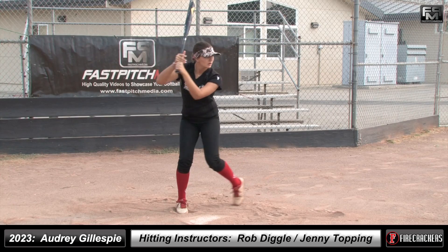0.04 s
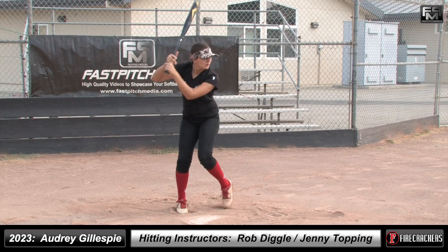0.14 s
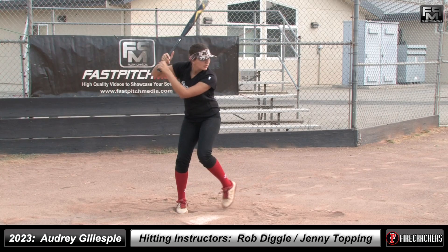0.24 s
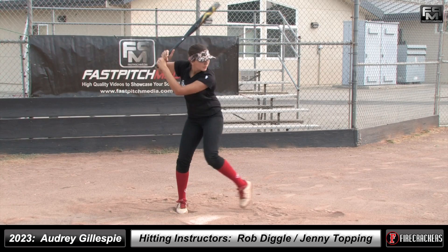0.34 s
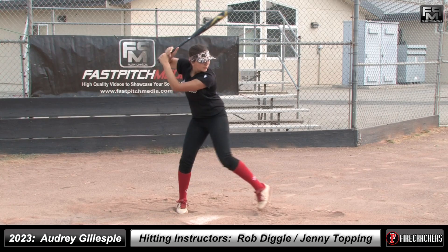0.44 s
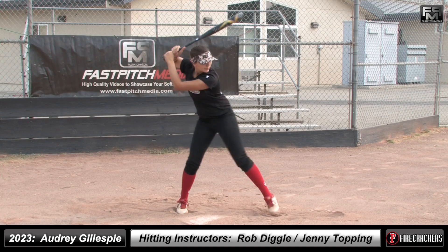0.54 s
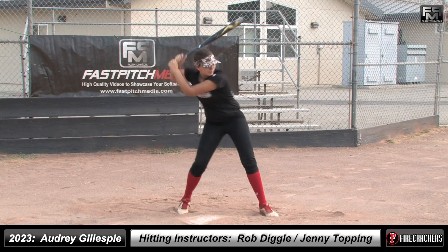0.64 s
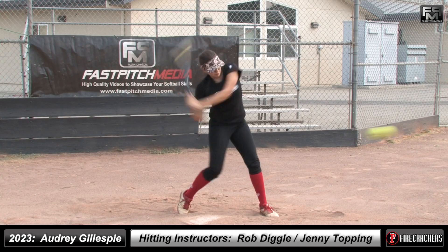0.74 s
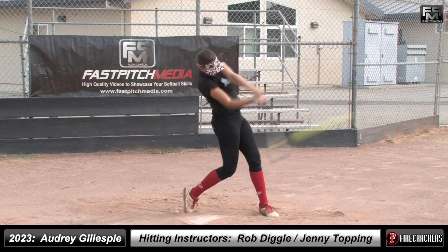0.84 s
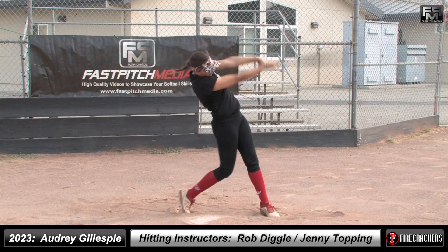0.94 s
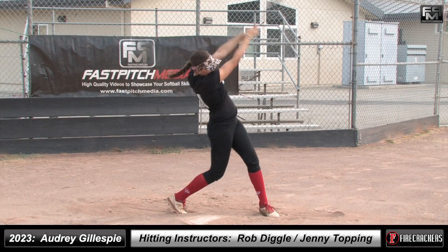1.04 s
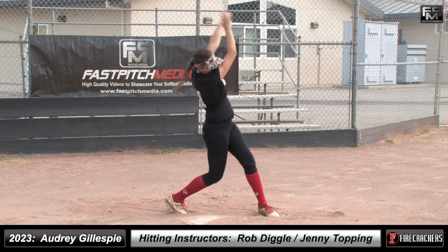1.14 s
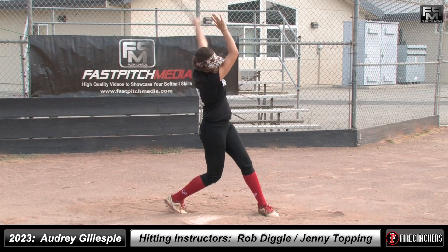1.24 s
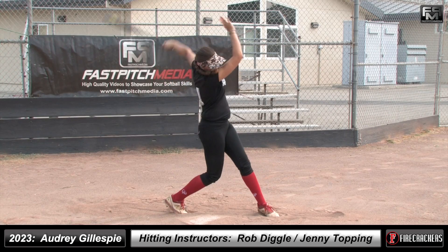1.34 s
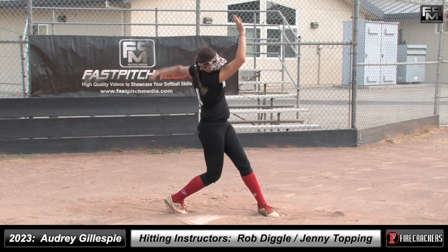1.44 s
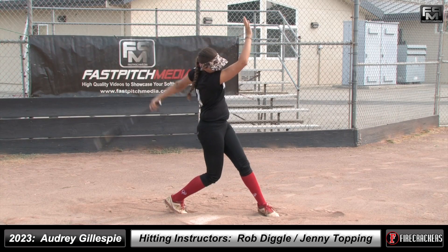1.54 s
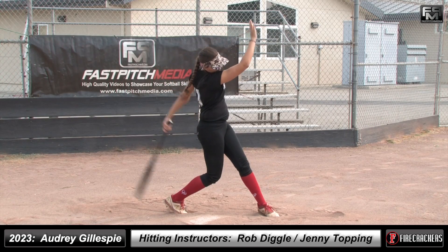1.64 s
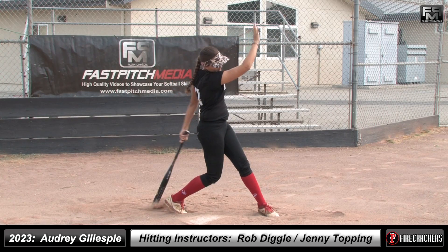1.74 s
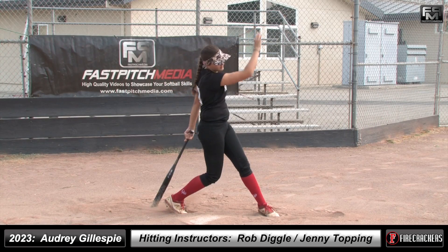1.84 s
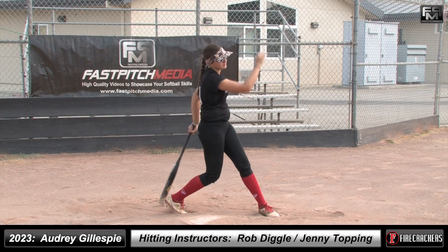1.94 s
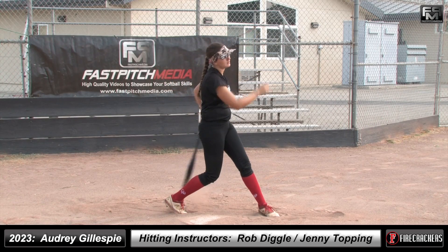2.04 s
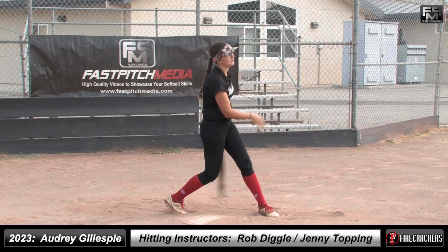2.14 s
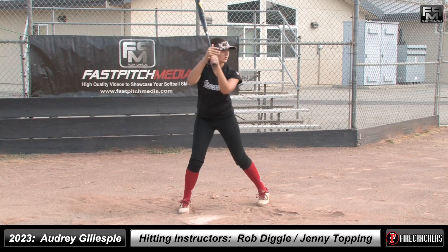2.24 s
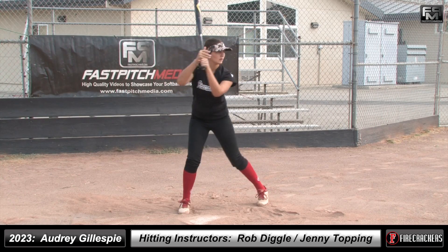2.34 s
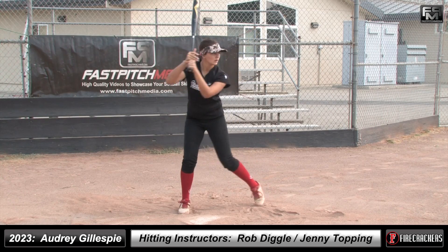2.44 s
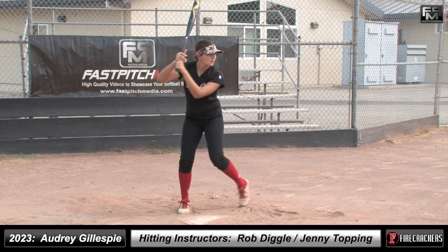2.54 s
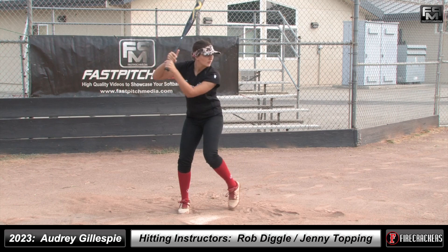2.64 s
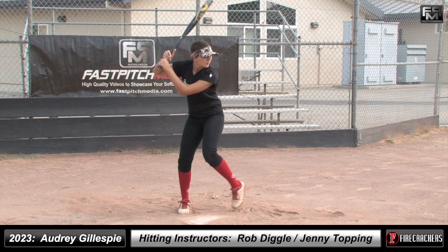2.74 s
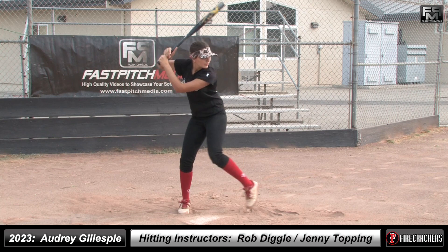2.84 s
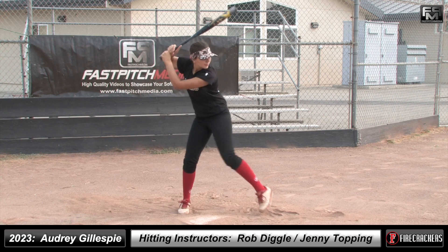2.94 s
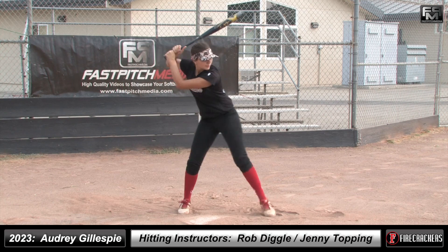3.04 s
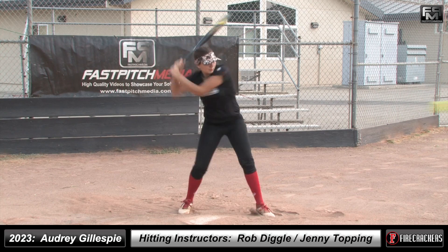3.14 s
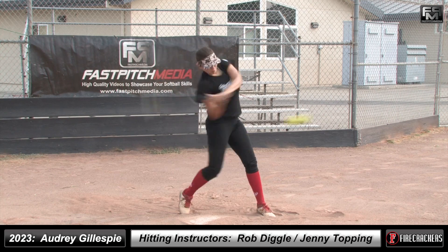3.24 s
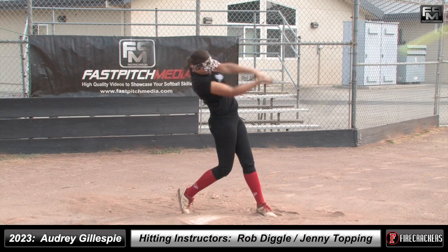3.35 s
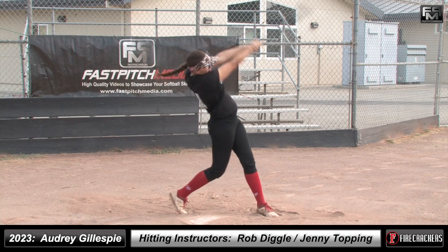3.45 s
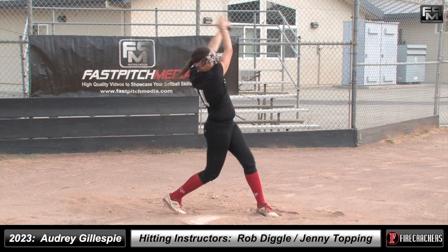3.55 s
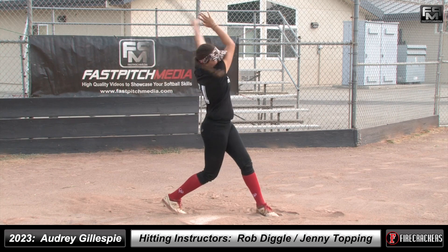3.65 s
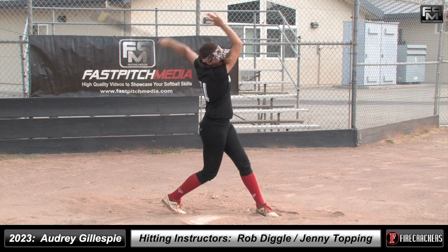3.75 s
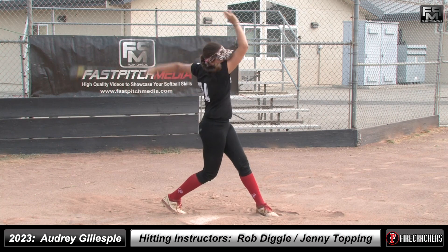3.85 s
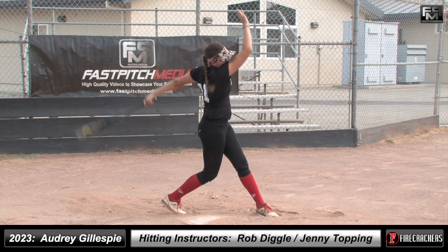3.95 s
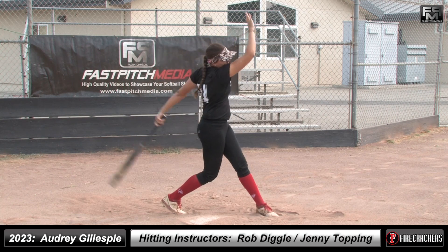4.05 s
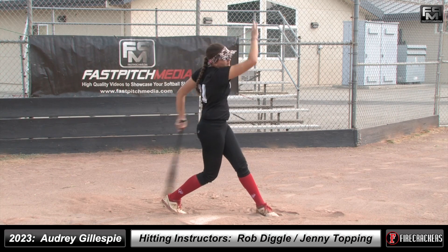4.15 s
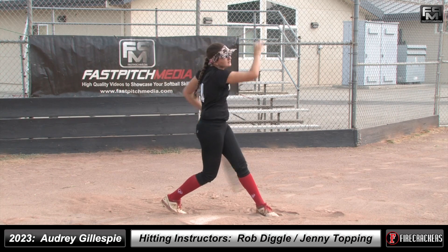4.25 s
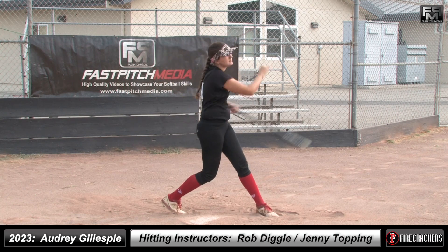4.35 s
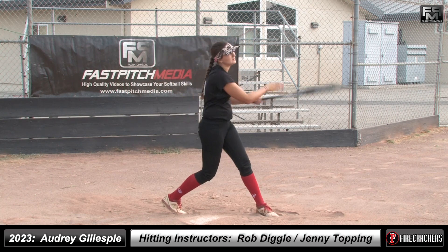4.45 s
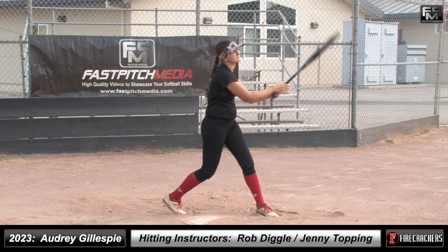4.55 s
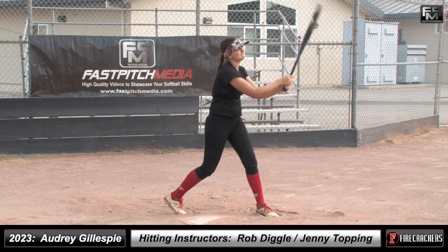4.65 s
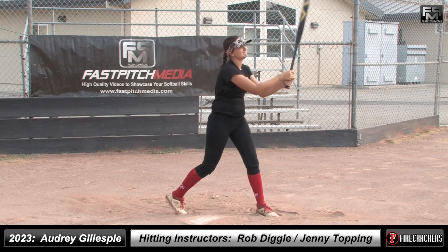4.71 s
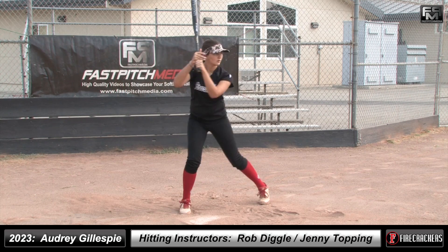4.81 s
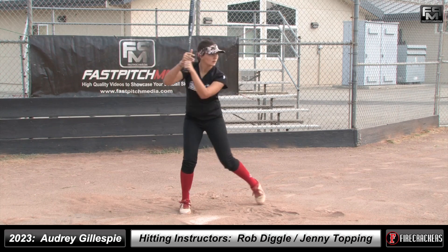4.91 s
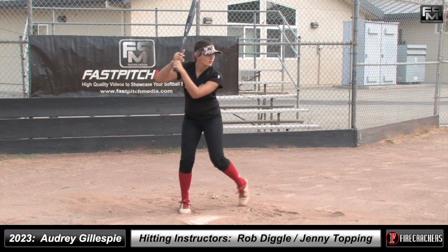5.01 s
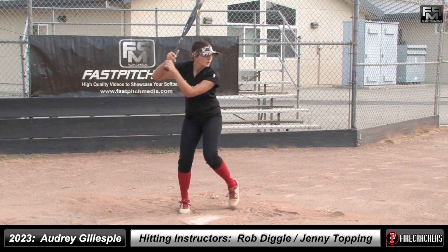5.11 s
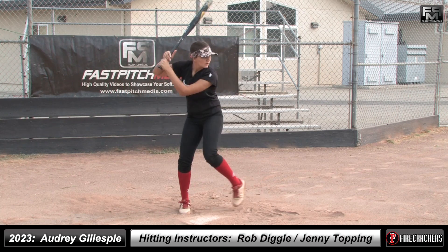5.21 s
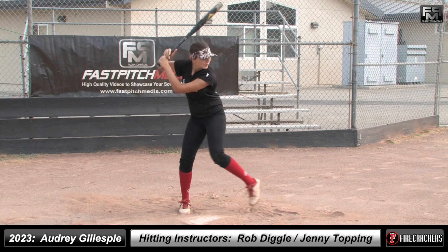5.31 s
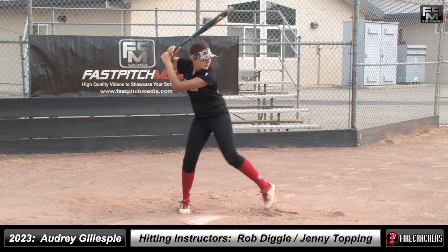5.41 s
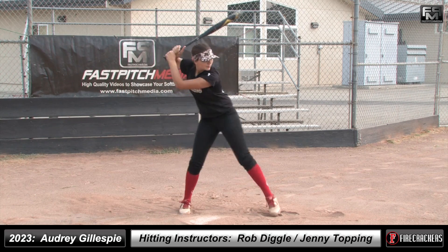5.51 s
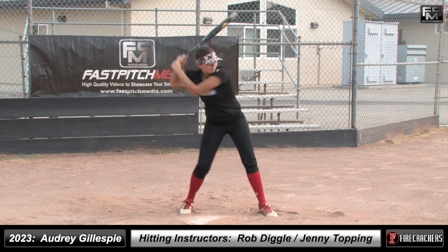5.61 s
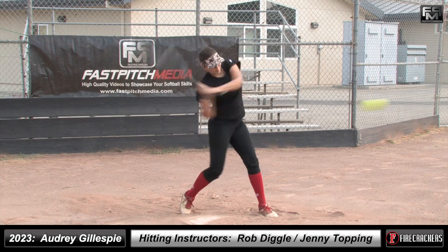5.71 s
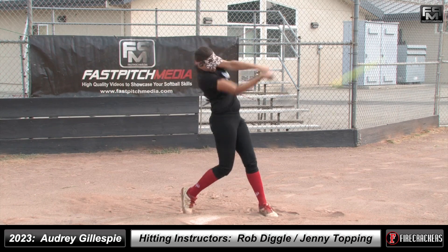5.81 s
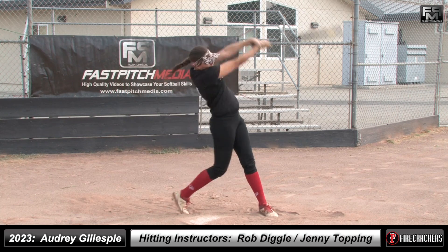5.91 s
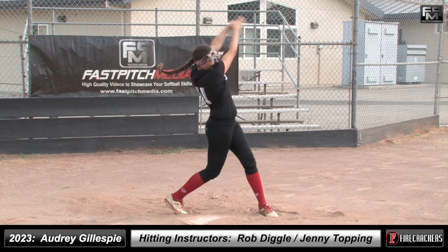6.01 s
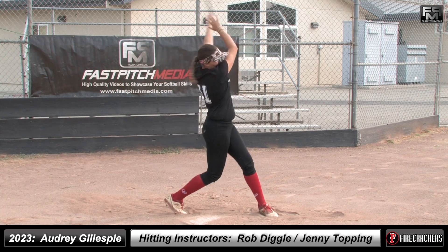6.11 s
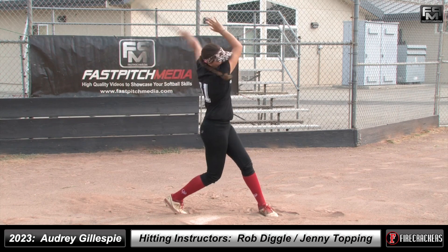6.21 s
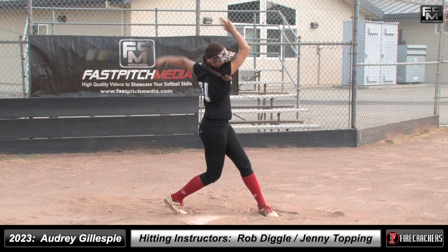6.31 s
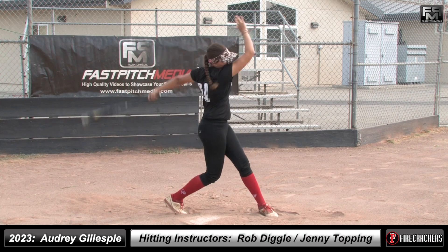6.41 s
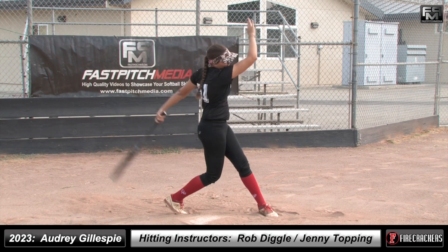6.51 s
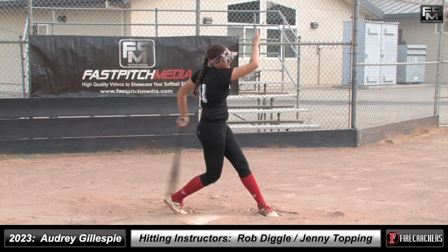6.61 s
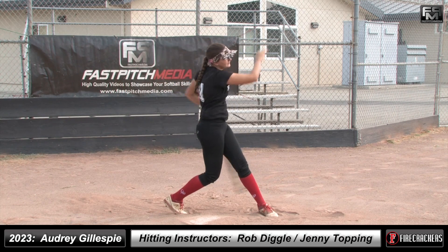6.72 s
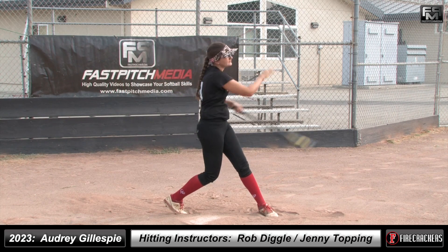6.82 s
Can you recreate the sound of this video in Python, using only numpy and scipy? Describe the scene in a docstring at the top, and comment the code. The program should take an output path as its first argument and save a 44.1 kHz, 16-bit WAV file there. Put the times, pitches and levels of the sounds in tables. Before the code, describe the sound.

Outdoors on a dirt ball field, a fading glove slap and light shoe scuffs lead to a hard, hollow bat crack, overloaded at the microphone, with a grainy echo off fences and benches. The bat tip ticks on the ground. Then twice more: a soft leather slap, gritty scuffing, and another explosive crack with its scattered tail. Low distant traffic and machinery hum stay underneath.

```python
"""A glove slap is fading as shoes and grit scuff the dirt; then a hollow bat strikes the first of three balls.
Each crack is a noise burst on decaying barrel modes, clipped hard at the input, with filtered-noise echoes
and a grainy scattered tail from fences, benches and walls. After the first, the bat tip taps the ground.
Ahead of both later cracks a glove slaps (noise in leather resonances) and shoes scuff (swells of grains).
Throughout, traffic and machinery hum far away: wavering noise bands and narrow resonances."""
import sys
import numpy as np
from scipy import signal
from scipy.io import wavfile

SR = 44100
rng = np.random.default_rng(int(sys.argv[2]) if len(sys.argv) > 2 else 0)


def store_wav(level_fs):
    """Save 16-bit WAV to argv[1]."""
    pcm = np.round(np.clip(np.atleast_2d(level_fs), -1, 1) * 32767)
    wavfile.write(sys.argv[1], SR, pcm.T.astype(np.int16))


N = 302967


def amp(db):
    """Gain of a level in dB."""
    return 10 ** (np.asarray(db) / 20)


def rms_one(x):
    """Scaled to rms 1."""
    return x / np.sqrt(np.mean(x ** 2) + 1e-20)


def at_hz(points, hz):
    """A spectrum table read on a log-frequency axis."""
    points = np.array(points)
    return np.interp(np.log(hz), np.log(points[:, 0]), points[:, 1])


def band(x, low_hz, high_hz):
    """Band-pass."""
    sos = signal.butter(2, [low_hz, high_hz], "band", fs=SR, output="sos")
    return signal.sosfilt(sos, x)


def low(x, hz):
    """Gentle low-pass."""
    sos = signal.butter(2, min(hz, .45 * SR), fs=SR, output="sos")
    return signal.sosfilt(sos, x)


def drift(rate_hz):
    """Slow chance: normal random knots, rate_hz per second, joined by straight lines."""
    knots = rng.standard_normal(int(N / SR * 60) + 3)
    return np.interp(np.arange(N) / SR * rate_hz, np.arange(len(knots)), knots)


def resonate(x, hz, width_hz):
    """Two-pole resonance with gain 1 on top."""
    r = np.exp(-np.pi * width_hz / SR)
    zeros = np.array([1, 0, -1]) * (1 - r * r) / 2
    poles = [1, -2 * r * np.cos(2 * np.pi * hz / SR), r * r]
    return signal.lfilter(zeros, poles, x)


def add(track, sound, start_s):
    """Mixes a sound into a track from start_s on, cut at the track's ends."""
    at = round(start_s * SR)
    part = sound[..., max(-at, 0):track.shape[-1] - at]
    first = max(at, 0)
    track[..., first:first + part.shape[-1]] += part


def pair(mid, side, alike):
    """Left and right from two unrelated signals."""
    alike = np.clip(alike, 0, 1)
    return np.sqrt((1 + alike) / 2) * mid + np.sqrt((1 - alike) / 2) * side * [[1], [-1]]


def bat():
    """Every blow arrives straight and by way of the field, whose grains and smears are drawn afresh each time."""
    # blows; the bat's angle sets the lag between the barrel's ends: (time [s], barrel level [dB],
    # ring length factor [1], lag toward microphone [ms], lag toward field [ms])
    blows = [(0.879, -0.14, 1.14, 0.16, 1.72), (3.3382, -5.5, 1.5, 2.225, 1.36),
             (5.8413, 6.5, 0.71, .89, 0.916)]
    click_db, click_low_hz, click_high_hz = 22.5, 260, 4900
    sideways_ring_factor = .6   # the turning bat smears its ring over directions: shorter toward the field
    out = np.zeros((2, N))
    impulse = np.arange(SR // 10) == 0
    click = band(amp(click_db) * impulse, click_low_hz, click_high_hz)
    for start_s, barrel_db, ring_factor, lag_ms, field_lag_ms in blows:
        direct = blow(barrel_db, ring_factor, lag_ms)
        add(out, direct * amp([[-1.], [1.]]), start_s)
        sideways = click + barrel(sideways_ring_factor, field_lag_ms, column=3)
        add(out, signal.fftconvolve(field(), sideways[None], axes=1), start_s)
    return out


def blow(barrel_db, ring_factor, lag_ms):
    """Heard straight on: a noisy crack as the ball flattens, and the barrel."""
    crack_db, crack_t60_s, crack_low_hz, crack_high_hz = 12.5, .012, 820, 5000
    t = np.arange(SR // 10) / SR
    burst = rng.standard_normal(len(t)) * amp(crack_db - 60 * t / crack_t60_s)
    crack = band(burst, crack_low_hz, crack_high_hz)
    return crack + amp(barrel_db) * barrel(ring_factor, lag_ms, column=2)


def barrel(ring_factor, lag_ms, column):
    """Decaying barrel modes; its ends radiate in opposite phase, so their lag sets each mode's level."""
    # barrel modes: (frequency [Hz], t60 before the ring length factor [s],
    # level toward microphone [dB], level toward field [dB])
    barrel_modes = [(640, 0.005, 5, -1.5), (860, 0.008, 11.5, -9), (1081, 0.017, 10.5, -4.7),
                    (1290, 0.012, -5, 3.5), (1914, 0.011, -1.1, -1.2), (2236, 0.015, 1.6, -4),
                    (2650, 0.0067, -0.86, 0.5), (3230, 0.0078, -2.9, -12.5), (4214, 0.0087, 0.5, -6)]
    far_end_share, onset_s = .7, .001
    t = np.arange(SR // 10) / SR
    ring = 0
    for mode in barrel_modes:
        hz, t60_s = mode[:2]
        both_ends = abs(1 - far_end_share * np.exp(2j * np.pi * hz * lag_ms / 1000))
        decay = amp(mode[column] - 60 * t / (t60_s * ring_factor))
        ring = ring + both_ends * decay * np.sin(2 * np.pi * hz * t)
    return ring * np.minimum(t / onset_s, 1)


def field():
    """Impulse response of the surroundings: smeared echoes on grainy scatter, decay set per band."""
    # hard surfaces, before the band losses: (delay [s], level [dB], left over right [dB], low-pass [Hz])
    echo_rows = [(.006, -10, -2, 9000), (.021, -14.5, -2.5, 9000), (.032, -10, -2, 3937),
                 (.040, -22, -7.5, 5060), (0.0538, -24, 5, 12170), (0.079, -18, 15, 11900),
                 (0.107, -19, -10, 2920), (0.112, -15.5, 10, 2130), (0.139, -23, -2, 9000),
                 (.175, -21.5, -2, 9000), (.186, -24, -3, 4830), (.2218, -21.5, 5, 3000),
                 (.245, -26.5, 4, 5000), (.269, -27.5, 3, 5000), (.301, -40, -2, 9000)]
    # extra decay of each band in air and at soft surfaces; negative slows it: (frequency [Hz], loss [dB/s])
    band_losses = [(300, 16.5), (800, 6.5), (1600, -11), (3000, -6), (5000, 26), (7500, 40), (11000, 80),
                   (16000, 123.5)]
    # scatter: (frequency [Hz], left-right likeness [1])
    scatter_alike = [(300, 0.63), (1400, .7), (3000, .3), (7000, 0.043)]
    grain_db = 3    # spread of the sizes of single small reflections
    patch_db = 4.5  # clusters of reflectors favour now one band, now another
    echo_smear_s = .0045   # fall to 1/e^2
    low_cut_hz = 760       # fences and benches return little bass
    # levels and decays ahead of the band losses
    # fence and benches close by: first, from the middle, soon over
    near_db, near_t60_s, near_end_s, near_side_share = -37, .17, .04, .5
    rise_s = .012
    # wide field: lingers, swells once more up to its far edge
    wide_db, wide_t60_s, edge_s, edge_swell_s, edge_db = -44, 1.287, .39, .14, 3.5

    t = np.arange(int(1.3 * SR)) / SR
    sizes_db = grain_db * np.minimum(rng.exponential(1, len(t)), 5)
    grains = rng.standard_normal((2, len(t))) * amp(sizes_db)   # rows: mid, side
    rise = np.minimum(t / rise_s, 1)
    near = amp(near_db - 60 * t / near_t60_s) * rise * (t < near_end_s) * [[1], [near_side_share]]
    swell_db = edge_db * np.clip(1 - (edge_s - t) / edge_swell_s, 0, 1) * (t < edge_s)
    wide = amp(wide_db - 60 * t / wide_t60_s + swell_db) * rise
    scatter = (near + wide) * rms_one(grains)

    echoes = np.zeros((2, len(t)))
    for delay_s, level_db, left_db, dull_hz in echo_rows:
        burst = rng.standard_normal(1500) * np.exp(-t[:1500] / echo_smear_s * 2)
        burst = low(burst, dull_hz)
        burst = burst / np.sqrt(np.sum(burst ** 2) * SR / 2 / dull_hz)   # equal energy per Hz
        add(echoes, amp(level_db) * burst * amp([[left_db / 2], [-left_db / 2]]), delay_s)

    out, below = 0, 0
    for hz, loss_db_per_s in band_losses:   # differences of low-passes split the range without gaps
        upto = low(np.vstack([scatter, echoes]), hz * 1.25)
        part, below = upto - below, upto
        patches = amp(patch_db * drift(40)[:len(t)])
        scatter_part = patches * pair(*part[:2], at_hz(scatter_alike, hz))
        out = out + (scatter_part + part[2:]) * amp(-loss_db_per_s * t)
    return signal.sosfilt(signal.butter(2, low_cut_hz, "high", fs=SR, output="sos"), out)


def glove():
    """A click and a short noise puff in the leather's resonances, its echoes, and a thin wash behind."""
    # slaps, level ahead of the leather: (time [s], level [dB])
    slaps = [(-.022, -30.5), (2.3124, -24), (4.8001, -34.5)]
    # surfaces as heard from the glove: (delay [s], level [dB])
    slap_echoes = [(.004, -13), (.018, -17), (0.0663, -14.5), (.088, -23), (0.182, -18.5), (.192, -26),
                   (.233, -26)]
    # leather resonances: (frequency [Hz], width [Hz], gain [dB])
    leather = [(400, 520, 13), (710, 240, 19.5), (1340, 390, 8), (2200, 186, 20), (2770, 290, 15),
               (4600, 770, 8), (9000, 6100, -9)]
    puff_t60_s, click_gain = .018, 6
    echo_low_hz, echo_high_hz = 1600, 6800
    wash_db, wash_t60_s, wash_low_hz, wash_high_hz = -17.5, .84, 920, 4300   # dB re puff
    out, t = np.zeros(N), np.arange(SR // 2) / SR
    for start_s, level_db in slaps:
        puff = rng.standard_normal(len(t)) * amp(-60 * t / puff_t60_s) + click_gain * (t == 0)
        puff = puff * amp(level_db)
        slap = 0
        for k, (hz, width_hz, gain_db) in enumerate(leather):
            slap = slap + (-1) ** k * amp(gain_db) * resonate(puff, hz, width_hz)   # alternating sign
        add(out, slap, start_s)
        for delay_s, echo_db in slap_echoes:
            add(out, amp(echo_db) * band(slap, echo_low_hz, echo_high_hz), start_s + delay_s)
        wash = band(rng.standard_normal(len(t)), wash_low_hz, wash_high_hz)
        add(out, wash * amp(level_db + wash_db - 60 * t / wash_t60_s), start_s)
    return out


def dirt():
    """Scuffs are swells of uneven grains; ticks are single grains."""
    # scuff shapes: (rise [s], fall [s], low edge [Hz], high edge [Hz]); events: (time of top [s], level [dB])
    # front shoe drags back before the stride
    drag, drags = (0.068, 0.034, 710, 2760), [(.28, -51), (2.775, -42.5), (5.262, -45)]
    # a shoe is set down
    step, steps = (.007, .03, 2300, 8500), [(.052, -72), (.66, -65), (.783, -57.5), (.82, -66), (3.13, -61),
                                 (4.744, -59), (5.609, -60)]
    # long soft treble hisses of grit, some over the drags
    hiss, hisses = (.045, .12, 4500, 10500), [(.061, -77), (.85, -66.5), (1.80, -72), (2.75, -68.5), (3.249, -68),
                                   (4.821, -63.5), (5.042, -73), (5.25, -68), (5.773, -64.5), (6.48, -72)]
    # bat tip touches the ground and bounces
    tap, taps = (.0015, .015, 3000, 13000), [(1.723, -38), (1.756, -58)]
    # the loudest ticks of grit, some within the drags: (time [s], level [dB], centre [Hz])
    ticks = [(.0955, -48, 4000), (.288, -44, 6000), (2.754, -45, 1910), (2.781, -39, 2100),
             (3.845, -55, 2704), (4.742, -40, 3300), (4.7686, -42, 2400), (4.7825, -50, 6740),
             (4.953, -51.5, 7500), (5.217, -49, 5800), (5.247, -39, 3420), (5.7683, -44, 2700),
             (6.563, -43, 2980)]
    grit_spread_db = 5
    tick_span, tick_decay_s = 1.72, .0006   # span: factor from centre to either band edge
    out, t = np.zeros(N), np.arange(SR) / SR - .5
    for shape, events in [(drag, drags), (step, steps), (hiss, hisses), (tap, taps)]:
        rise_s, fall_s, low_hz, high_hz = shape
        swell = np.exp(-(t / np.where(t < 0, rise_s, fall_s)) ** 2)
        for top_s, level_db in events:
            sizes_db = grit_spread_db * np.minimum(rng.exponential(1, SR), 5)
            grains = rng.standard_normal(SR) * amp(sizes_db)
            scuff = rms_one(band(low(grains, high_hz), low_hz, high_hz))
            add(out, amp(level_db) * swell * scuff, top_s - .5)
    for start_s, level_db, hz in ticks:
        grain = rng.standard_normal(400) * np.exp(-np.arange(400) / SR / tick_decay_s)
        tick = band(grain, hz / tick_span, hz * tick_span) * np.sqrt(SR / 3 / hz)   # evens out bandwidth
        add(out, amp(level_db) * tick, start_s)
    return out


def far():
    """Half-octave bands of noise that waver a little, plus narrow hums."""
    # traffic and air, relative: (frequency [Hz], density [dB per Hz])
    far_spectrum = [(13, -65), (22, -47), (59, -4.5), (112, -3.5), (179, -9), (242, -6.5), (328, -16.5),
                    (356, -15.5), (585, -13), (1490, -28), (1910, -28.5), (2900, -38), (4140, -46),
                    (5030, -43), (16000, -59.5)]
    # (frequency [Hz], left-right likeness [1])
    far_alike = [(100, 1), (640, 0.94), (1400, .85), (3100, 0.6), (6800, 0.031)]
    # machinery: (frequency [Hz], width per resonator pass [Hz], rms level [dB])
    hums = [(114.6, 8, -56), (142, 6.9, -50.5), (240.8, 2.1, -56), (380, 10, -61), (609, 8.9, -58)]
    noise_rms_db, together_db, single_db = -41.5, .32, .59   # waver of all bands, of each band
    noise, together, white = 0, drift(.75), rng.standard_normal((2, 2, N))
    edges_hz = 22 * 2 ** np.arange(0, 9.6, .5)
    for k, (low_hz, high_hz) in enumerate(zip(edges_hz, edges_hz[1:])):
        hz = np.sqrt(low_hz * high_hz)
        gain = amp(at_hz(far_spectrum, hz) + together_db * together + single_db * drift(11.0))
        mid, side = band(white[k % 2], low_hz, high_hz)
        noise = noise + gain * pair(mid, side, at_hz(far_alike, hz))
    hum = 0
    for hz, width_hz, level_db in hums:
        tone = resonate(resonate(white[0, 0], hz, width_hz), hz, width_hz)
        hum = hum + amp(level_db) * rms_one(tone)
    return amp(noise_rms_db) * rms_one(noise) + hum


def scene():
    """All sources at the microphone pair; glove and dirt lean right."""
    return bat() + glove() * amp([[-2.4], [2.4]]) + dirt() * amp([[-.3], [.3]]) + far()


def record(dry):
    """Housing resonances, uneven capsules, hard clipping, steep top cut, low cut."""
    # housing resonances: (frequency [Hz], width [Hz], gain [dB])
    housing = [(4280, 480, 5.5), (7080, 700, 3), (5360, 1800, -4), (3335, 200, -0.5)]
    left_db, left_cut_hz = 3.5, 4900   # left capsule more sensitive, except in the treble
    clip_level, top_cut_hz, low_cut_hz = .93, 16300, 30
    for hz, width_hz, gain_db in housing:
        dry = dry + (amp(gain_db) - 1) * resonate(dry, hz, width_hz)
    below_treble = signal.lfilter(*signal.butter(1, left_cut_hz, fs=SR), dry)
    dry = dry + (amp([[left_db / 2], [-left_db / 2]]) - 1) * below_treble
    clipped = np.clip(dry, -clip_level, clip_level)
    cut = signal.sosfilt(signal.cheby2(18, 50, top_cut_hz, fs=SR, output="sos"), clipped)
    cut = signal.lfilter(*signal.butter(1, low_cut_hz, "high", fs=SR), cut)
    return np.clip(cut, -1, 1)


dry = scene()
out = record(dry)
store_wav(out)
```